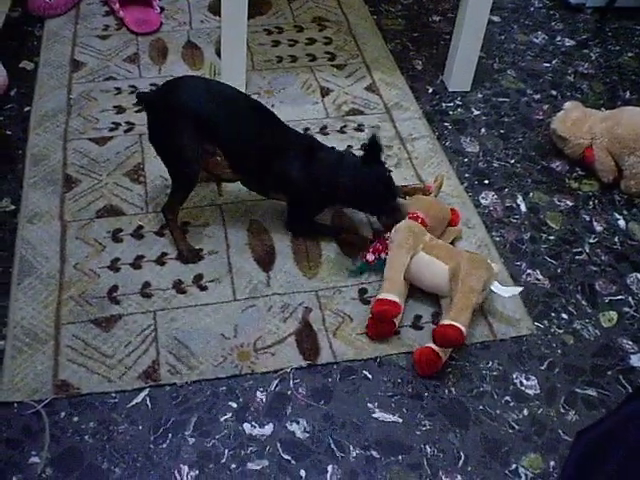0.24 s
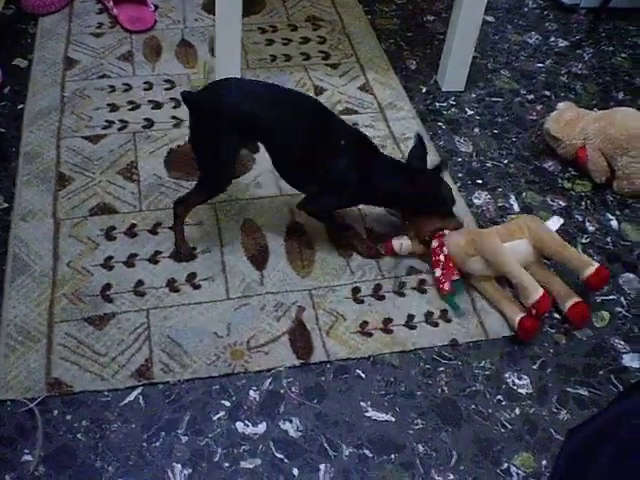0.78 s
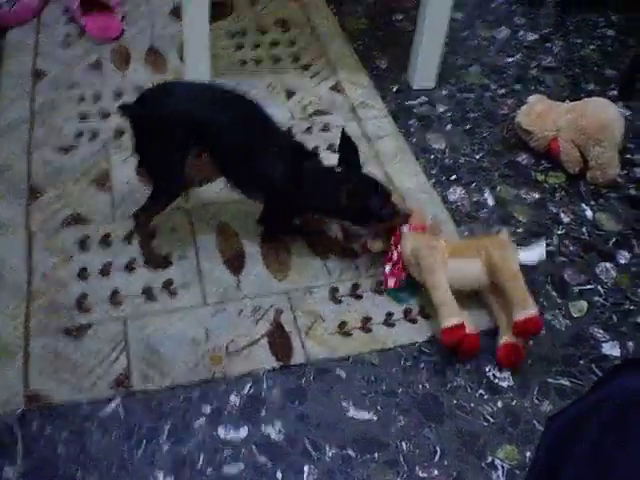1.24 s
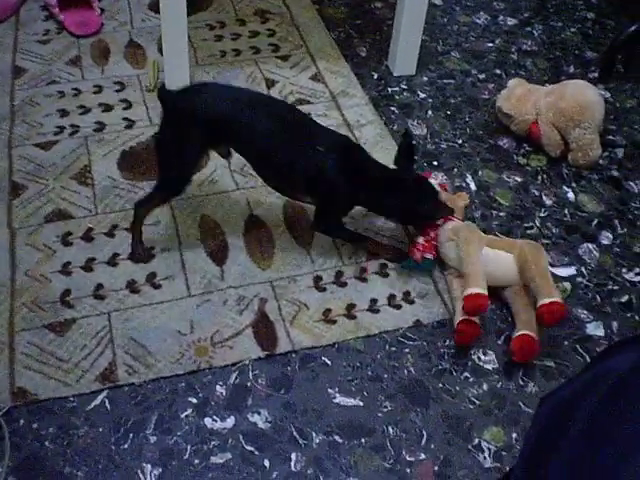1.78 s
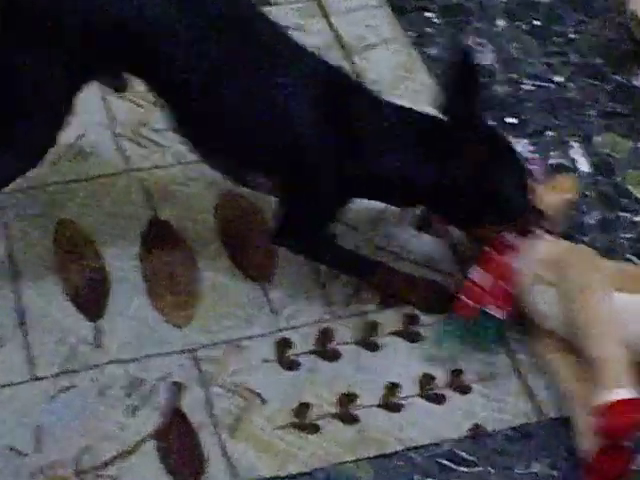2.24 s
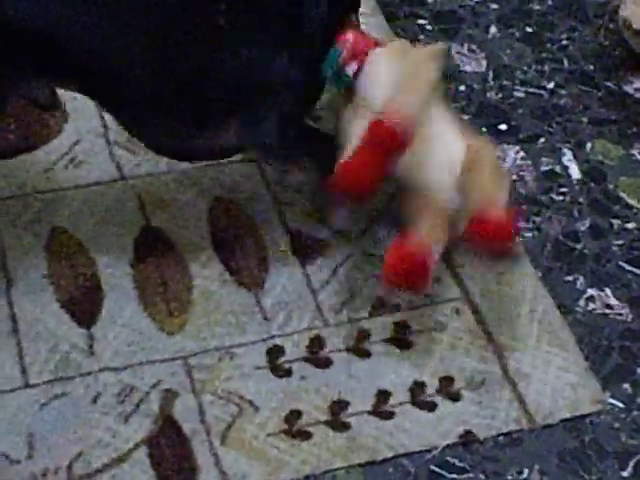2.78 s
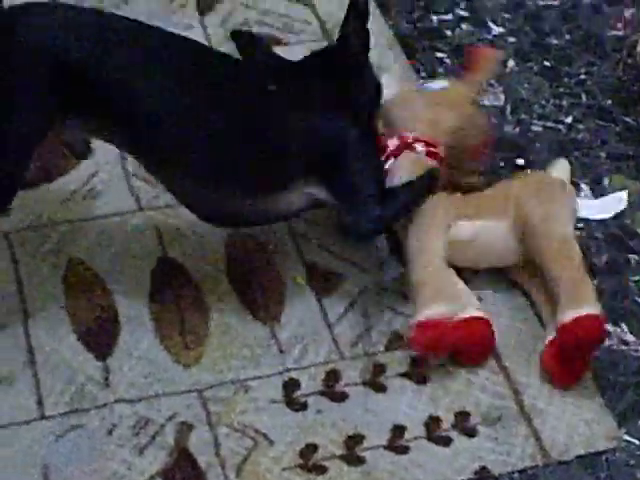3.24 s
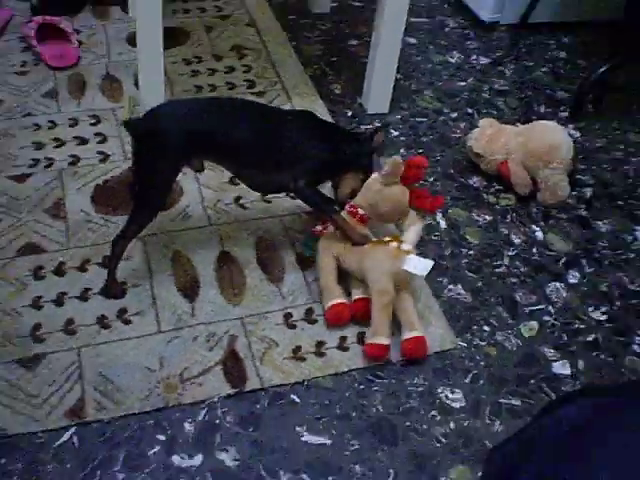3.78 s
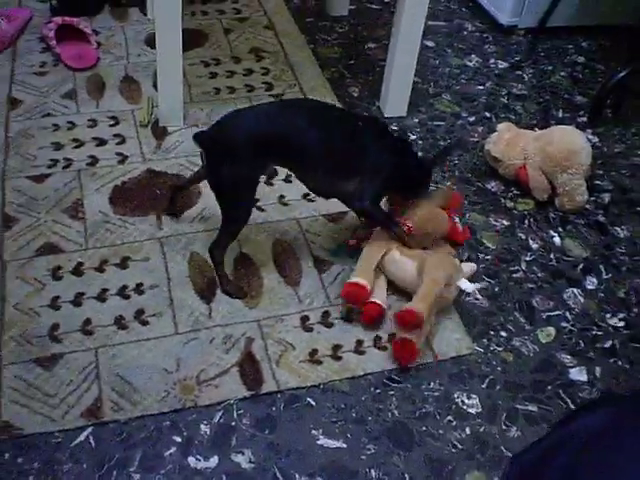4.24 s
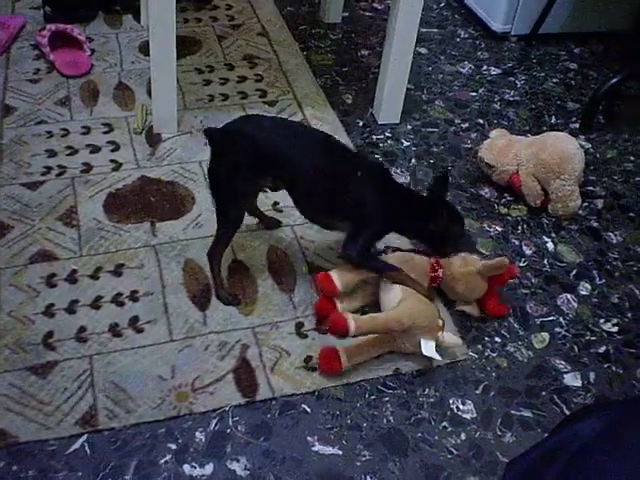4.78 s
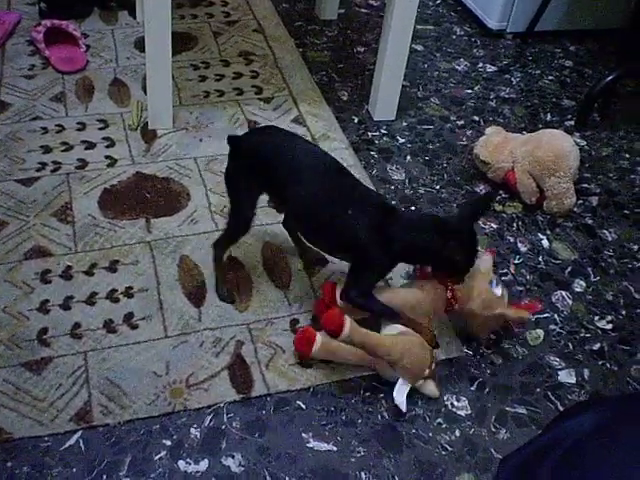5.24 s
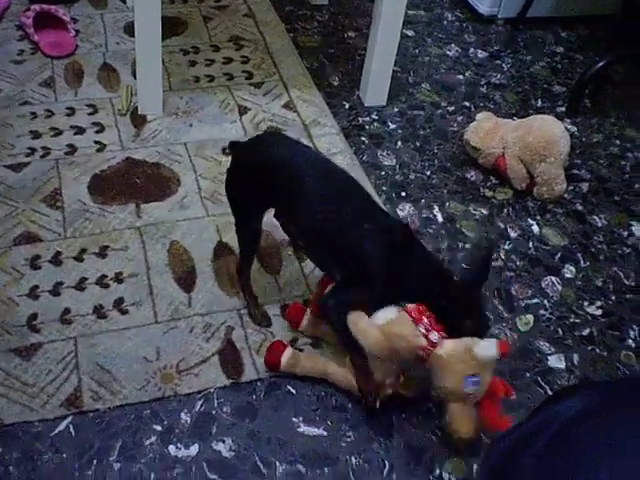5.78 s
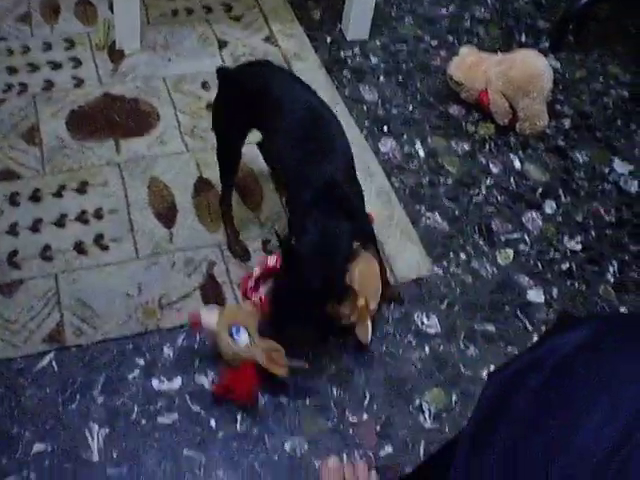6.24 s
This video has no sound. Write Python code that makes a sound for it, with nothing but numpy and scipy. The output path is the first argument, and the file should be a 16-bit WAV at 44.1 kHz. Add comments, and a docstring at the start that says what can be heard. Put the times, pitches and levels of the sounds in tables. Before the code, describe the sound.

A small dog scuffles briefly with a soft toy while a camera's lever clicks loudly up close, over steady grainy hiss.

```python
"""Dog, toy and zoom lever

A small dog tussles with a plush toy on a rug; brief scuffs, each a run of tiny slips, come and go.
A pocket camera's zoom lever snaps four times beside the microphone, ringing the case and overloading
the sound. Light ticks and a faint motor whir sit over steady hiss and a low mains hum.
Everything passes through the camera's coarse 8-bit converter, which adds grit."""
import sys
import numpy as np
from scipy import signal
from scipy.fft import rfft, irfft
from scipy.io import wavfile
from scipy.ndimage import uniform_filter1d

SR = 44100
rng = np.random.default_rng(int(sys.argv[2]) if len(sys.argv) > 2 else 0)


def waveform_to_disk(signal):
    """Save audio, clipped to [-1, 1], as 16-bit WAV at the path in sys.argv[1]."""
    frames = np.transpose(np.atleast_2d(signal))
    scaled = np.clip(frames, -1, 1) * 32767
    samples = np.round(scaled).astype(np.int16)
    wavfile.write(sys.argv[1], SR, samples)


N = 286653

# The zoom lever pressed and let go; low_boost_db changes the case's lower tones.
# start_s, force_db, low_boost_db, ring_time_factor, note_hz, note_boost_db, rattle_db
LEVER_SNAPS = [(1.7036, 3, -3.5, 0.78, 2904, -0.9, -30), (2.2204, 3.5, 12.5, 0.85, 3450, -7, -20),
               (3.2112, 7, -6, 0.64, 3004, 2.5, -28), (3.7406, 10, 2.5, 0.94, 3029, 5, -26)]
# The tones the camera case rings with: pitch_hz, level_db, fade_s (time to fall by 60 dB)
CASE_TONES = [(134.8, -40, 0.0087), (311.4, -42.5, 0.11), (420, -25, 0.0079), (913, -14.5, .019),
              (1097, -12.5, 0.012), (1226, -10, 0.01), (1604, -12, 0.015), (2046, -11, 0.012),
              (2400, -25, 0.049), (2622, -10.5, 0.015), (3422, -2.5, 0.0085), (3725, -8, 0.0095),
              (3912, -13, 0.013)]
# Tone colour of loose parts shaking after a snap: frequency_hz, level_db
RATTLE_COLOUR = [(60, 1.5), (290, -4), (560, -9.5), (900, 4.5), (1150, 3.5), (1600, -12), (2400, 0),
                 (3000, -11), (3400, -13.5), (4200, -12)]
# Rubbing strokes: start_s, length_s, attack_s, level_db, swell_db, brightness (0 to 1), squeak_amount
SCUFF_STROKES = [(0.096, 0.048, 0.003, -52, -5.5, 0.1, 1.1), (1.101, 0.0974, 0.014, -27.7, 3, 0.91, 0.024),
                 (2.926, 0.13, 0.043, -48, -2, 0.97, 0.32), (3.442, 0.077, 0.0023, -45.5, -13, 0.85, 0.27),
                 (4.09, 0.11, 0.005, -47.3, -5, 0.78, 1.3), (4.292, 0.046, 0.007, -44.5, -5, 0.96, 0.47),
                 (4.3385, 0.043, 0.002, -33.5, -9, 0.98, 0.12),
                 (4.566, 0.065, 0.0018, -46.5, -4, 0.74, 0.19),
                 (5.575, 0.062, 0.001, -45.5, -10.5, 0.31, 0.12)]
# Tone colours of a crisp, a muffled and a sticking, squeaky rub: frequency_hz, level_db
CRISP_COLOUR = [(100, -28), (400, -24), (650, -21), (900, -12), (1250, -7.5), (1600, -17), (2050, -11.5),
                (2450, 1.5), (2800, -6), (3150, -2), (3350, -3), (3600, 7), (3900, -7.5)]
MUFFLED_COLOUR = [(100, -12), (700, -14), (1100, 2.5), (1800, 6.5), (2300, 4), (2900, -23.5), (4200, -32)]
SQUEAK_COLOUR = [(2000, -17), (2850, -5.5), (3030, 4.5), (3200, -8.5), (4000, -42)]
# Light ticks, most likely fingers on the case: start_s, level_db, low_boost_db, note_hz
CASE_TICKS = [(1.1818, -18, -13, 3170), (1.1837, -20, -12, 3150), (1.4744, -23, 1, 2890),
              (2.19, -35.5, 2, 3180), (3.128, -32.5, 4, 2100), (3.2434, -27, -7, 2720),
              (3.4235, -32, -8, 2300), (3.4336, -29, -8, 2210), (3.4408, -22, -14, 2470),
              (4.2082, -31.5, -4, 2960), (4.2402, -31, 5, 3060), (4.3015, -27, 3.5, 1180),
              (4.567, -35, -4, 2700), (4.6066, -34.5, 0, 3400), (4.6426, -31.5, 0, 3190)]
# Runs of the lens motors: start_s, length_s, level_db
MOTOR_RUNS = [(2.232, 0.28, -72), (3.223, 0.9, -71)]
# The whir of each run: pitch_hz
MOTOR_PITCHES = [600, 363]
# Tone colour of the room and microphone hiss: frequency_hz, level_db
HISS_COLOUR = [(20, -8), (35, -9), (70, -11), (140, -9.5), (200, -5), (300, -5.5), (550, -7), (850, -2.5),
               (1050, -3.5), (1290, -0.5), (1700, -3.5), (2150, -6.5), (2400, -7.5), (3400, -7.5),
               (3900, -10)]
# Mains hum: pitch_hz, level_db
HUM_TONES = [(100.2, -67.5), (200.4, -80)]


def lever_snaps(note_fade_s=0.012, note_rise_s=0.0011, rattle_fade_s=0.054, rattle_delay_s=0.0027,
                room_db=-28, room_fade_s=0.22):
    """Each snap rings the lever and the case, then shakes loose parts and echoes faintly in the room."""
    out, t = np.zeros(N), np.arange(SR // 4) / SR
    rattle_fade = fade(t, rattle_fade_s) + gain_of(room_db) * fade(t, room_fade_s)
    note_rise = 1 - np.exp(-t / note_rise_s)
    for start_s, force_db, low_boost_db, ring_factor, note_hz, note_boost_db, rattle_db in LEVER_SNAPS:
        note = np.sin(2 * np.pi * note_hz * t) * note_rise * fade(t, note_fade_s * ring_factor)
        rattle = coloured(rng.standard_normal(len(t)), RATTLE_COLOUR) * rattle_fade
        add(out, start_s, gain_of(force_db) * case_knock(low_boost_db, ring_factor))
        add(out, start_s, gain_of(force_db + note_boost_db) * note)
        add(out, start_s + rattle_delay_s, gain_of(rattle_db) * rattle)
    return out


def case_knock(low_boost_db, ring_factor, low_edge_hz=1500, rise_s=0.00024):
    """One blow rings the case; a blunter one (more low boost) favours the tones around 1 kHz."""
    t = np.arange(SR // 8) / SR
    out = np.zeros(len(t))
    for k, (hz, level_db, fade_s) in enumerate(CASE_TONES):
        boost_share = min(hz / 600, 1) / (1 + (hz / low_edge_hz) ** 4)
        # struck away from the microphone, neighbouring tones swing opposite ways
        swing = (-1) ** k * np.sin(2 * np.pi * hz * t)
        out += gain_of(level_db + low_boost_db * boost_share) * fade(t, fade_s * ring_factor) * swing
    return out * (1 - np.exp(-t / rise_s))


def scuffs(slips_per_s=2500, spread_db=2, fibre_hiss=0.2, release_s=0.004,
           room_db=-17.5, room_fade_s=0.27):
    """Rubbing is many tiny, uneven slips over fibre hiss; a stroke grips, swells or eases, and lets go."""
    out, t = np.zeros(N), np.arange(SR // 3) / SR
    slip_size = gain_of(spread_db * np.minimum(rng.exponential(1, N), 3)) * rng.choice([-1, 1], N)
    slipping = rng.random(N) < slips_per_s / SR
    friction = slip_size * slipping + fibre_hiss * rng.standard_normal(N)
    crisp = coloured(friction, CRISP_COLOUR)
    muffled = coloured(friction, MUFFLED_COLOUR)
    squeak = coloured(friction, SQUEAK_COLOUR)
    for start_s, length_s, attack_s, level_db, swell_db, bright, squeaky in SCUFF_STROKES:
        span = slice(round(start_s * SR), round(start_s * SR) + len(t))
        progress = np.minimum(t / length_s, 1)
        since_end_s = np.maximum(t - length_s, 0)
        pressure = gain_of(level_db + swell_db * (progress - 0.5)) * np.minimum(t / attack_s, 1)
        contact = np.maximum(1 - since_end_s / release_s, 0)
        rub = unit_level(bright * crisp[span] + (1 - bright) * muffled[span] + squeaky * squeak[span])
        room_gain = progress * gain_of(room_db) * fade(since_end_s, room_fade_s)
        dull_echo = room_gain * unit_level(rub + muffled[span])
        add(out, start_s, pressure * (contact * rub + dull_echo))
    return out


def ticks(note_boost_db=0.5, note_fade_s=0.007, grit_db=-8, grit_fade_s=0.012,
          strays_per_s=1.2, stray_db=-41, stray_spread_db=2, stray_hz=2500):
    """Light touches ring the case and the spot touched, with some grit; fainter ones fall at random."""
    out, t = np.zeros(N), np.arange(SR // 8) / SR
    chance = rng.random((round(strays_per_s * N / SR), 2))
    strays = [(when * N / SR, stray_db + stray_spread_db * (2 * size - 1), 0, stray_hz)
              for when, size in chance]
    for start_s, level_db, low_boost_db, note_hz in CASE_TICKS + strays:
        knock = case_knock(low_boost_db, ring_factor=0.7)
        note = np.sin(2 * np.pi * note_hz * t) * fade(t, note_fade_s)
        grit = coloured(rng.standard_normal(len(t)), CRISP_COLOUR) * fade(t, grit_fade_s)
        tick = knock + gain_of(note_boost_db) * note + gain_of(grit_db) * grit
        add(out, start_s, gain_of(level_db) * tick)
    return out


def lens_motors(waver=0.021):
    """The lens motors whir at a slightly unsteady speed."""
    out = np.zeros(N)
    for (start_s, length_s, level_db), pitch_hz in zip(MOTOR_RUNS, MOTOR_PITCHES):
        drift = unit_level(uniform_filter1d(rng.standard_normal(N), size=2000))[:round(length_s * SR)]
        wavering_hz = pitch_hz * (1 + waver * drift)
        whir = np.sqrt(2) * np.sin(2 * np.pi * np.cumsum(wavering_hz) / SR)
        add(out, start_s, gain_of(level_db) * whir * signal.windows.tukey(len(whir), 0.2))
    return out


def hiss_and_hum(hiss_db=-54):
    """The room and microphone hiss evenly while the mains hums."""
    t = np.arange(N) / SR
    hum = sum(gain_of(level_db) * np.sqrt(2) * np.sin(2 * np.pi * (hz * t + rng.random()))
              for hz, level_db in HUM_TONES)
    return gain_of(hiss_db) * coloured(rng.standard_normal(N), HISS_COLOUR) + hum


def gain_of(db):
    """Turns decibels into a multiplier."""
    return 10 ** (np.asarray(db) / 20)


def fade(t, fade_s):
    """Dies away by 60 dB every fade_s seconds."""
    return np.exp(-np.log(1000) * t / fade_s)


def unit_level(sound):
    """Scales a sound to an average (rms) level of 1."""
    return sound / np.sqrt(np.mean(sound ** 2) + 1e-20)


def coloured(sound, colour):
    """Filters a sound with a tone colour table and sets its level to 1."""
    table_hz, table_db = np.transpose(colour)
    hz = np.fft.rfftfreq(len(sound), 1 / SR)
    curve_db = np.interp(np.log(hz + 1), np.log(table_hz), table_db)
    return unit_level(irfft(rfft(sound) * gain_of(curve_db), len(sound)))


def add(mix, start_s, sound):
    """Lays a sound into the mix at start_s."""
    part = mix[round(start_s * SR):][:len(sound)]
    part += sound[:len(part)]


def scene():
    """Everything meets at one microphone."""
    return (lever_snaps() + ticks() + scuffs() + hiss_and_hum() + lens_motors())[None]


def record(dry, rate_hz=8000, full_scale=0.72, intake_hz=4300, soften_hz=14000, top_hz=16500):
    """A slow 8-bit converter: quiet sound flips only its last bit, a gritty hiss; snaps overload it."""
    taps, filter_rate_hz = 32 * 441 + 1, 80 * SR
    intake = signal.firwin(taps, intake_hz, window=("kaiser", 9), fs=filter_rate_hz)
    smoothing = signal.firwin(taps, rate_hz / 2, window=("kaiser", 9), fs=filter_rate_hz)
    top_cut = signal.firwin(301, top_hz, window=("kaiser", 8), fs=SR)
    step = full_scale / 128  # 8 bits give 128 steps each side of zero
    slow = signal.resample_poly(dry[0], rate_hz, SR, window=intake)
    stepped = np.clip(step * np.floor(slow / step), -full_scale, full_scale)
    smooth = signal.resample_poly(stepped, SR, rate_hz, window=smoothing)[:N]
    # peaks that overshoot between samples are flattened again: the only sound in the high treble
    flattened = np.clip(smooth, -full_scale, full_scale)
    softened = signal.lfilter(*signal.butter(2, soften_hz, fs=SR), flattened)
    return signal.oaconvolve(softened, top_cut, "same")[None]


dry = scene()
out = record(dry)
waveform_to_disk(out)
```